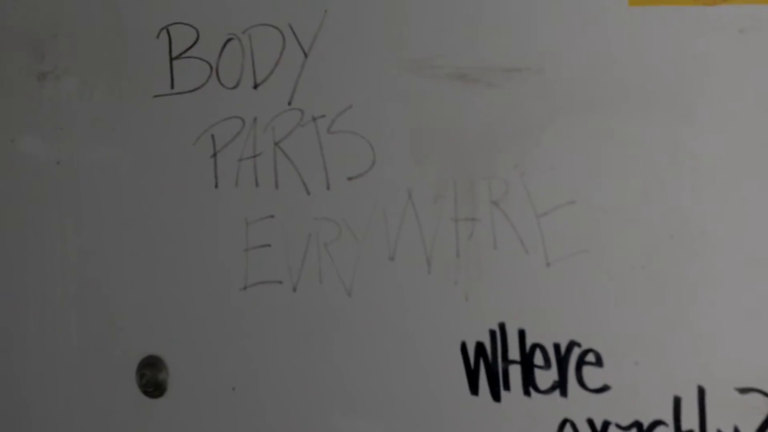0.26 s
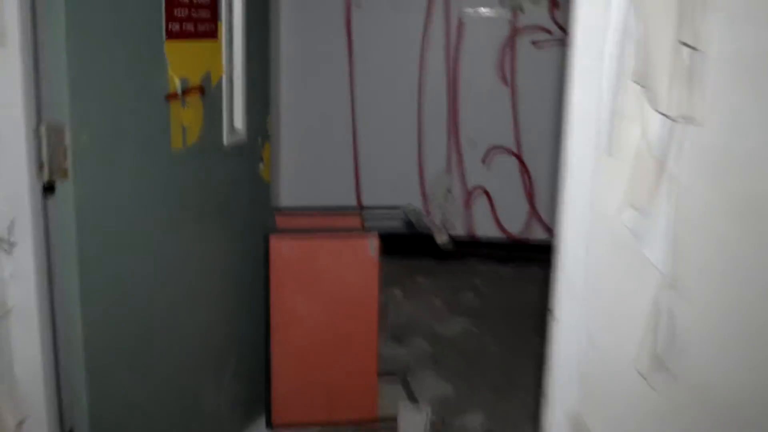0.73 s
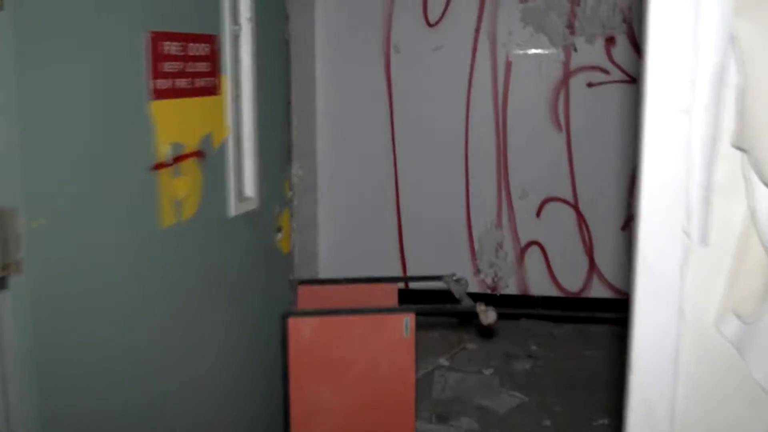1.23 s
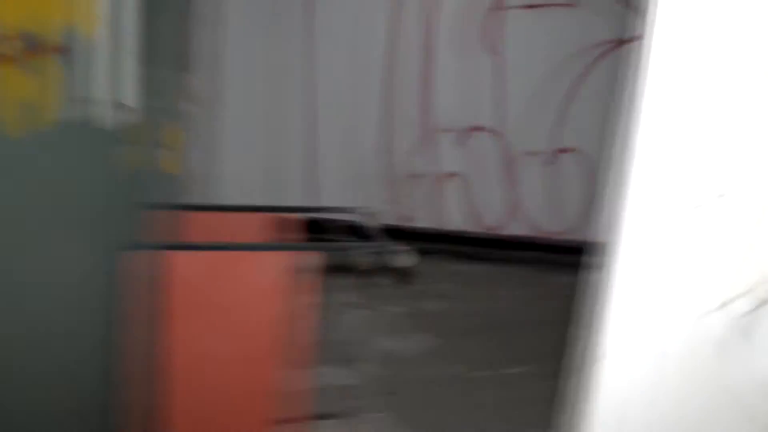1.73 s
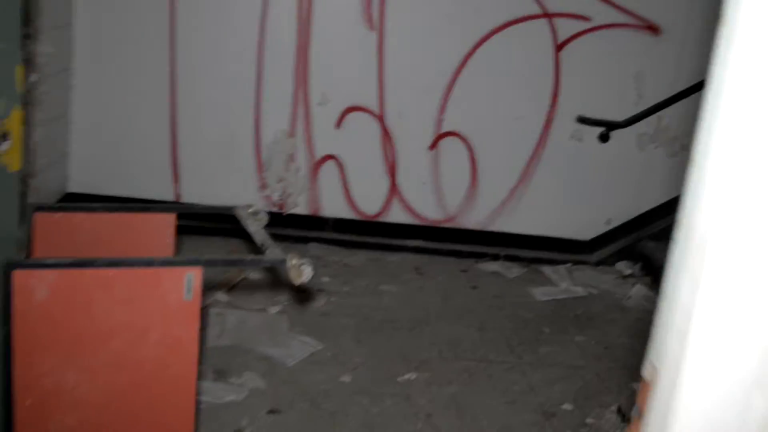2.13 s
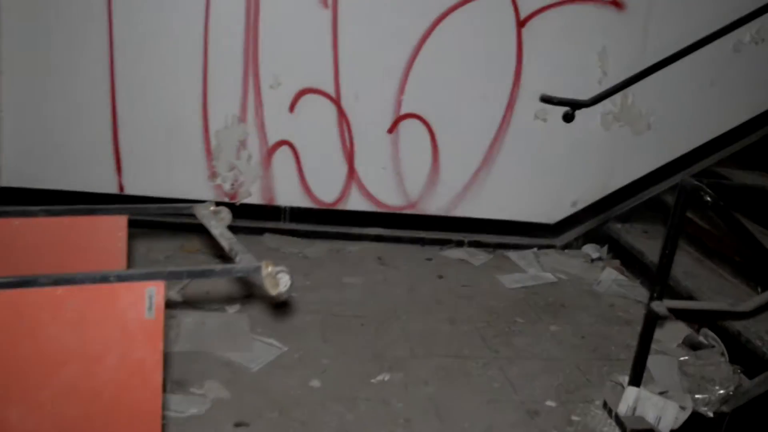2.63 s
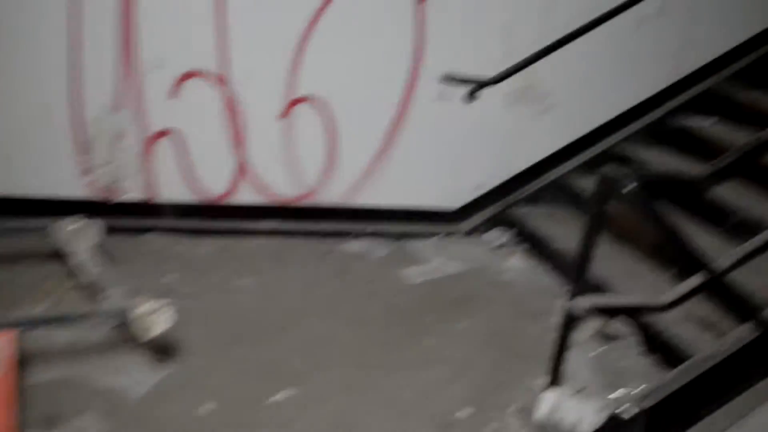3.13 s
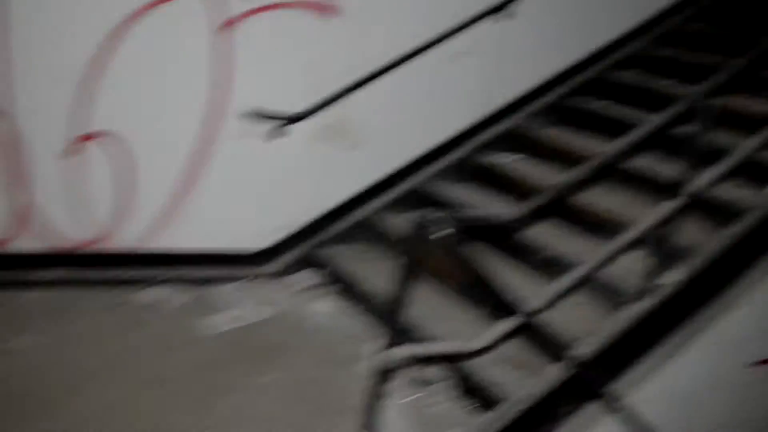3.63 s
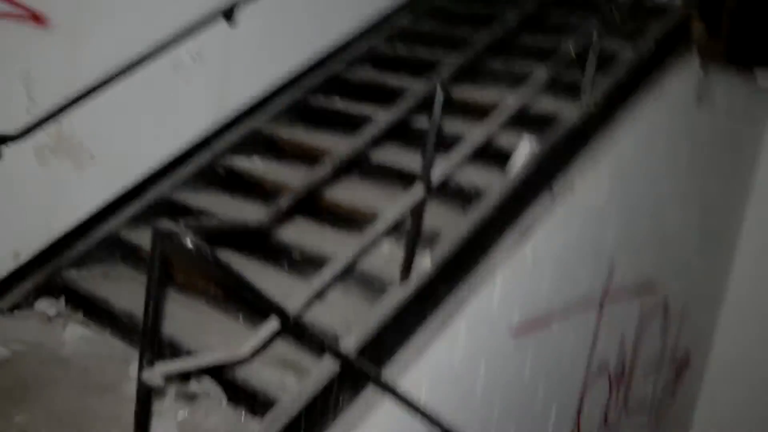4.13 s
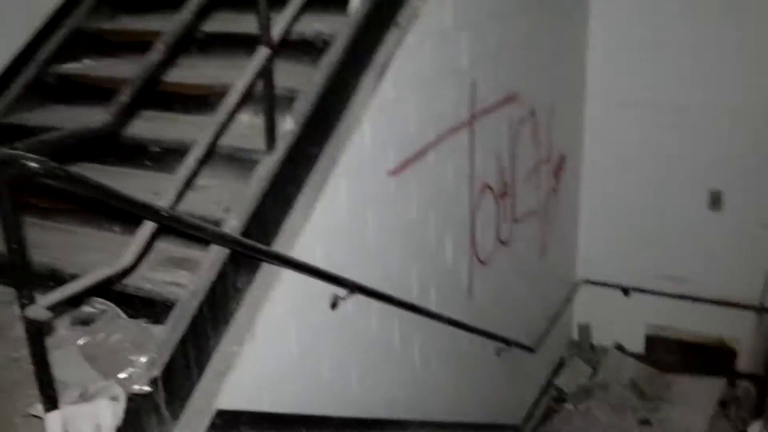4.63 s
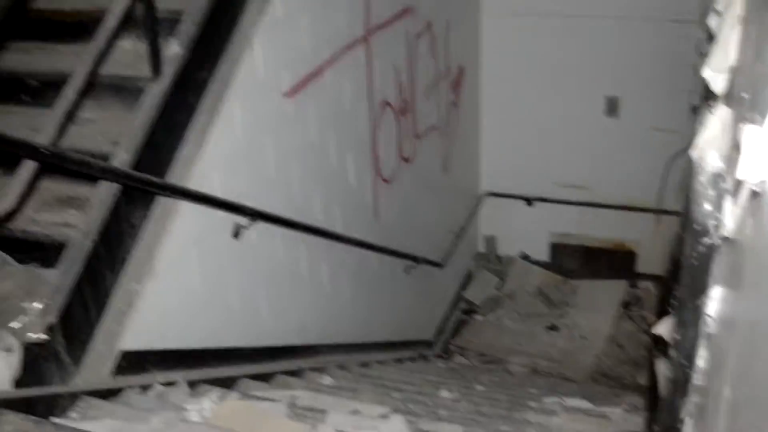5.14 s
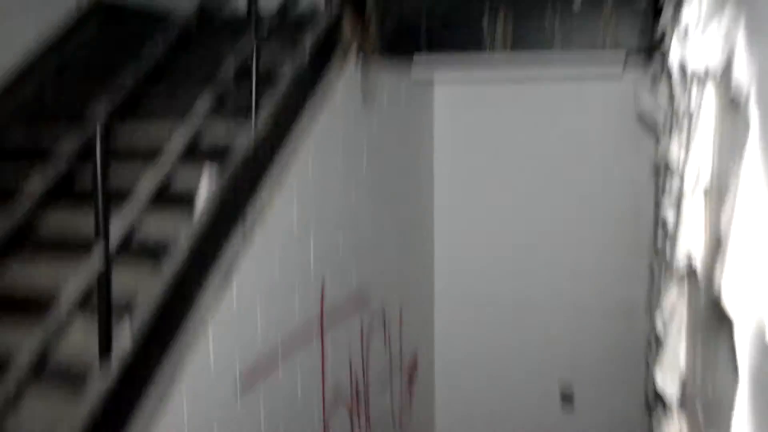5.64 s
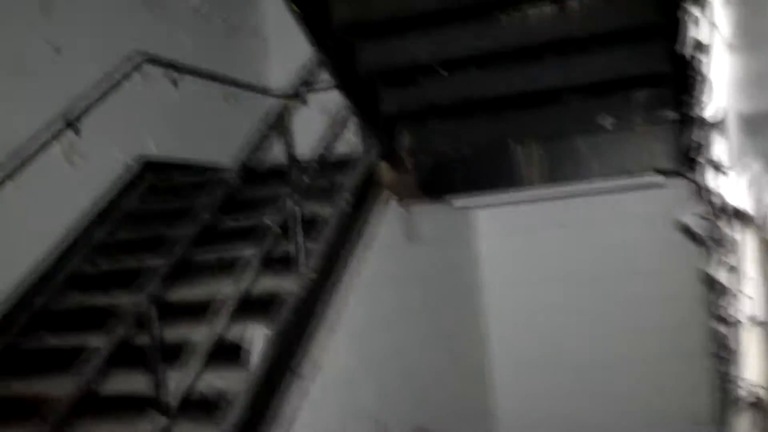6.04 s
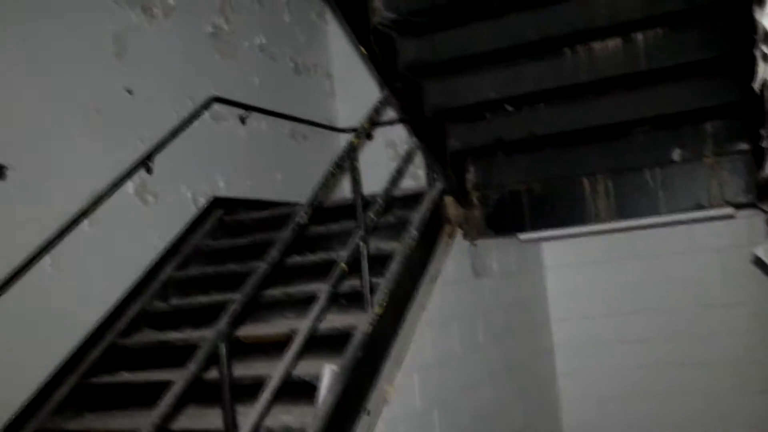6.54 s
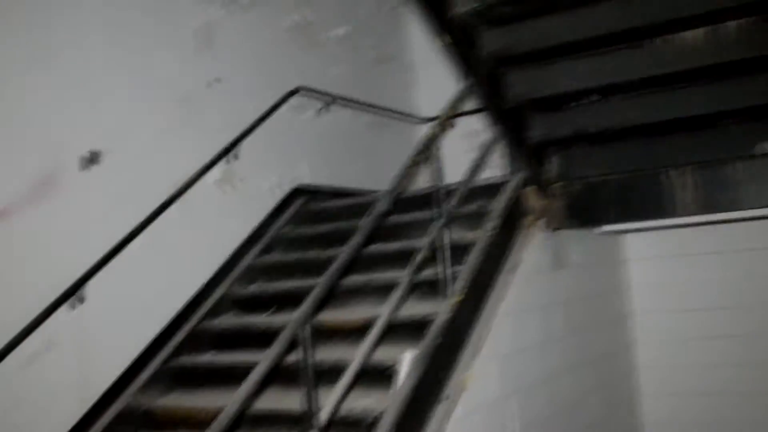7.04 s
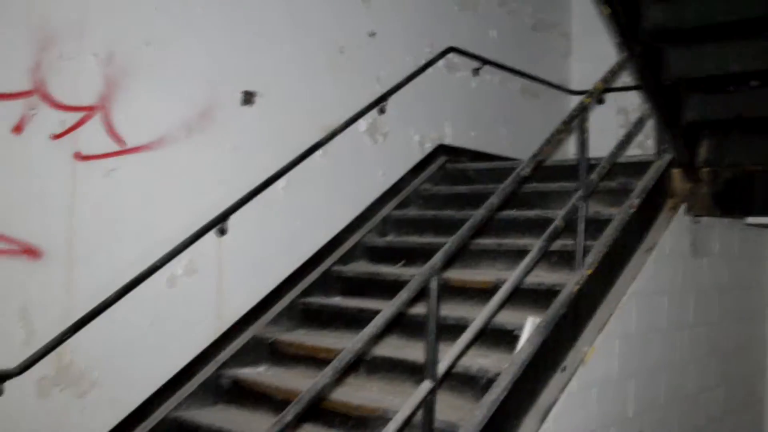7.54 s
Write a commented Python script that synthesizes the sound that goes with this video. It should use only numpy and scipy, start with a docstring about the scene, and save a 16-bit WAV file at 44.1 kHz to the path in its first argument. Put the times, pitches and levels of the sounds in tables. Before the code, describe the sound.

A quiet abandoned stairwell with hard walls, heard through one microphone near the walker's feet. Airy room tone and faint hiss start slightly stronger, with a low hum that fades after about 0.3 s. A small crackle at 0.1 s and light scuffs lead to the first footstep at 0.9 s: soft heel thud, sharp cluster of breaking flakes, grinding grit and a hollow slab knock near 1.0 s. The second step lands at 1.7 s, with strong snaps around 2.1 s. The third, slower step begins at 2.7 s, with a dense, full crunch and louder knock near 2.85 s, then crackles until about 3.4 s. Debris thins to small ticks; a brighter snap comes at 5.0 s with a faint scuff after. Near-stillness follows until light shuffles from 6.9 s to the end around 7.8 s. Each crunch rings briefly in the stairwell.

```python
"""Feet on fallen plaster and paint flakes, from a doorway into a bare concrete stairwell, at one microphone.
Over a quiet room tone with a low hum strong at first, stray flakes snap and the feet shuffle lightly.
Then three slow footsteps: each heel thuds, the sole rolls flat and grinds the grit, slabs knock, and flakes
snap, full-bodied under the weight and thin once it lifts. Later the walker only shifts on the spot.
Close walls answer grainy noise bursts at once; noise with a decaying envelope makes the stairwell ring on."""
import sys
import numpy as np
from scipy import signal
from scipy.fft import rfft, irfft, next_fast_len
from scipy.io import wavfile
from scipy.ndimage import map_coordinates

SR = 44100
rng = np.random.default_rng(int(sys.argv[2]) if len(sys.argv) > 2 else 0)


def bounce(signal):
    """Save signal as a 16-bit WAV file at the path given by the first command-line argument."""
    frames = np.transpose(np.atleast_2d(signal))
    limited = np.clip(frames, -1, 1)
    pcm = np.round(limited * 32767).astype(np.int16)
    wavfile.write(sys.argv[1], SR, pcm)


N = 342657

LIFE = 36864  # samples in one contact sound, its tail included
AGE = np.arange(LIFE) / SR  # s since the contact
HZ = np.fft.rfftfreq(LIFE, 1 / SR)
BLOW = np.sqrt(0.02 * SR)  # gives a sound of energy 1 an rms of 1 over 20 ms

# footsteps: heel_down_s, roll_s (until the sole is flat), weight_stays_s, heel_level_db, heel_pitch_hz,
# sole_level_db, grind_level_db
FOOTSTEPS = [(0.874, 0.052, 0.25, -38.5, 330, -54.5, -33), (1.711, 0.042, 0.21, -46.5, 282, -48.5, -37.5),
             (2.681, 0.15, 0.6, -45.5, 565, -51.5, -43.5)]


def amp(db):
    """Decibels to gain."""
    return 10 ** (np.asarray(db) / 20)


def unit(x):
    """Scale to rms 1."""
    return x / np.sqrt(np.mean(x ** 2) + 1e-20)


def packet(x):
    """Scale to energy 1."""
    return x / np.sqrt(np.sum(x ** 2) + 1e-20)


def fade(t, t60):
    """Exponential decay, down 60 dB after t60 seconds."""
    return np.exp(-np.log(1000) * t / t60)


def along(points, hz):
    """Interpolate (Hz, value) points on a log frequency axis."""
    point_hz, value = np.transpose(points)
    return np.interp(np.log(hz + 1), np.log(point_hz + 1), value)


def curves(rows):
    """One value per sample for each column after the time."""
    s, *columns = np.transpose(rows)
    return [np.interp(np.arange(N) / SR, s, column) for column in columns]


def filtered(x, response):
    """Filter x by a response given as a function of frequency."""
    size = next_fast_len(len(x) + SR // 2)
    spectrum = rfft(x, size) * response(np.fft.rfftfreq(size, 1 / SR))
    return irfft(spectrum, size)[:len(x)]


def resonance(f, hz, width):
    """A causal resonance of height 1, width in Hz."""
    return 1j * f * width / (hz * hz - f * f + 1j * f * width)


def add(track, s, sound):
    """Mix a sound into the track at time s."""
    part = track[max(round(s * SR), 0):][:len(sound)]
    part += sound[:len(part)]


def wobble(rate):
    """A smooth random curve, rate knots a second."""
    knots = rng.standard_normal(int(N * rate / SR) + 4)
    return map_coordinates(knots, [np.arange(N) * rate / SR])


def room_tone(hum_hz=90.6, waver_db=3.0):
    """Air moving through the building and a faint hiss, as shaped noise, and two wavering hums."""
    # colour of the moving air: pitch_hz, level_db (per Hz)
    air_colour = [(15, -23), (25, -7.5), (60, -5.5), (120, -0.5), (200, -0.5), (300, -2), (600, -2.5),
                  (950, 0), (1400, -4.5), (2000, -11), (3000, -16.5), (5000, -39.5), (16000, -94)]
    # colour of the hiss: pitch_hz, level_db (per Hz)
    hiss_colour = [(300, -17), (1500, 5), (2800, 0), (5000, -3.5), (9800, -7), (12000, -16), (14000, -27),
                   (16000, -50.5)]
    # levels over time: time_s, air_level_db, hiss_level_db
    air_levels = [(0, -51.5, -56.5), (0.45, -57.5, -61), (2.6, -60.5, -62), (4, -61, -67), (6.2, -62, -70),
                  (7.77, -59.5, -63)]
    # upper hum over time: time_s, level_db
    upper_levels = [(0, -76), (4.5, -78.5), (7.77, -66)]
    low_db, low_rest_db = -64, -84  # strong at first, then barely there
    low_ends_s, low_t60 = 0.32, 0.35

    def noise(response):
        return unit(filtered(rng.standard_normal(N), response))

    t = np.arange(N) / SR
    air_db, hiss_db = curves(air_levels)
    upper_db, = curves(upper_levels)
    air = amp(air_db + 0.34 * wobble(9)) * noise(lambda f: amp(along(air_colour, f)))
    hiss = amp(hiss_db) * noise(lambda f: amp(along(hiss_colour, f)))

    strength = amp(low_db) * fade(np.maximum(t - low_ends_s, 0), low_t60) + amp(low_rest_db)
    tone = unit(np.sin(2 * np.pi * hum_hz * t + 0.5 * wobble(6.8)))
    low_hum = strength * amp(waver_db * wobble(13)) * tone
    # the upper hum is noise in a narrow band, so it wavers by itself
    upper_hum = amp(upper_db) * noise(lambda f: resonance(f, 212, 49) ** 2)
    return air + hiss + low_hum + upper_hum


def flake_colour(body_db, clack_db, fizz_db, ring_hz, ring_db=0, ring_width=0.24):
    """Causal response of debris: thick ones have body, thin ones fizz, each has one damped resonance."""
    # average colour of the debris: pitch_hz, level_db (per Hz)
    debris = [(60, -40), (200, -28.5), (450, -12.5), (620, -7.5), (760, -6), (1100, -1), (1800, -2),
              (3200, -5), (5000, -7.5), (6500, -9.5), (8200, -10.5), (10300, -14.5), (13000, -30.5),
              (16000, -46.5)]
    tilt = [(700, body_db), (1500, clack_db), (3200, 0), (4400, 0.001), (6800, fizz_db)]  # Hz, dB
    # folding the cepstrum forward in time makes the response minimum-phase
    cepstrum = irfft(np.log(amp(along(debris, HZ) + along(tilt, HZ))))
    cepstrum[1:LIFE // 2] *= 2
    cepstrum[LIFE // 2 + 1:] = 0
    ring = 1 + amp(ring_db) * resonance(HZ, ring_hz, ring_width * ring_hz)
    return np.exp(rfft(cepstrum)) * ring


def grains(rate, spread_db):
    """Random tiny impulses, rate a second; a positive spread makes a few strong, a negative one a few weak."""
    size = amp(spread_db * np.minimum(rng.standard_exponential(LIFE), 4))
    return (rng.random(LIFE) < rate / SR) * size * rng.choice([-1, 1], LIFE)


def close_walls(force, t60=0.11):
    """Every grain breaks at its own spot, so its reflections add in power to those of the others."""
    echo_power = fade(AGE, t60) ** 2 * (AGE > 0.002)
    power = np.abs(irfft(rfft(force ** 2) * rfft(echo_power)))
    return packet(grains(rate=7000, spread_db=3.0) * np.sqrt(power))


def stairwell_tail(force):
    """Diffuse sound builds up in the stairwell; its treble dies first."""
    # ring of the stairwell: pitch_hz, t60_s
    stairwell = [(200, 0.42), (1200, 0.47), (3000, 0.47), (6000, 0.41), (12000, 0.37)]
    hz, t, noise = signal.stft(rng.standard_normal(LIFE), SR, nperseg=256)
    drive = np.add.reduceat(force ** 2, np.arange(0, LIFE, 128))  # energy per noise frame
    decay = fade(t, along(stairwell, hz)[:, None]) * (1 - fade(t, 0.11))
    power = np.abs(signal.fftconvolve(decay ** 2, drive[None], axes=1)[:, :len(t)])
    return signal.istft(noise * np.sqrt(power), SR, nperseg=256)[1][:LIFE]


def heard(force, colour, far_db, walls_db=-1, stairwell_db=-9):
    """A contact with the close walls' reflections, together of energy 1, then the stairwell's tail."""
    def tinted(x):
        return packet(irfft(rfft(x) * colour))

    near = tinted(packet(force) + amp(walls_db) * close_walls(force))
    return near + amp(stairwell_db + far_db) * tinted(stairwell_tail(force))


def weight_on(s):
    """Share of the walker's weight on the debris: it grows as the sole rolls flat, stays, and lifts."""
    lift_s = 0.13
    return sum(np.interp(s - heel_s, np.cumsum([0, roll_s, stay_s, lift_s]), [0, 1, 1, 0])
               for heel_s, roll_s, stay_s, *_ in FOOTSTEPS)


def snap(t60=0.0068):
    """One fracture through a flake: a click of nearly even spectrum, smeared over a few milliseconds."""
    phase = np.angle(rfft(rng.standard_normal(LIFE) * fade(AGE, t60)))
    return packet(irfft(np.exp(1j * phase)) * fade(AGE, 0.028))


def chips(count=9):
    """Splinters fly off just after a snap, each with a brief ring at its own pitch."""
    low_hz, high_hz = 1000, 9980
    ring_t60, mean_delay_s = 0.016, 0.007
    track, t = np.zeros(LIFE), AGE[:SR // 20]
    for when, pitch, size in rng.random((count, 3)):
        hz = low_hz * (high_hz / low_hz) ** np.sqrt(pitch)
        ring = np.sin(2 * np.pi * hz * t) * fade(t, ring_t60)
        add(track, -mean_delay_s * np.log(1 - when), amp(-10 * size) * ring)
    return packet(track)


def fracture(share):
    """One snap; its crumbling share follows as a spray of grains, a few splinters and a second snap."""
    rise_t60, crumble_t60 = 0.004, 0.033
    chip_db, aftersnap_s, aftersnap_db = -3, 0.0073, -7.5
    share = np.clip(share, 0, 1)
    swell = (1 - fade(AGE, rise_t60)) * fade(AGE, crumble_t60)
    spray = packet(grains(rate=2500, spread_db=5.0) * swell)
    crumble = spray + amp(chip_db) * chips()
    add(crumble, aftersnap_s, amp(aftersnap_db) * snap())
    return np.sqrt(1 - share) * snap() + np.sqrt(share) * packet(crumble)


def cracks():
    """Flakes snap; the more weight on a piece and the more it clacks, the fuller it sounds."""
    # flakes that snap: start_s, level_db, ring_pitch_hz, clack_db, fizz_db, crumbling_share (0-1)
    flakes = [(0.08, -38, 3530, 2.5, 4.5, 1), (0.9242, -21.5, 910, -8, 0.5, 1),
              (0.9524, -19.5, 3060, -3.5, 6, 0.65), (0.9598, -22.5, 1850, -3, -3.5, 0.47),
              (1.1221, -27, 1000, 2.5, 5, 0.4), (1.2296, -35.5, 2260, -3, -4.5, 1),
              (1.2583, -43.5, 2170, -1, 10.5, 0.6), (1.332, -44, 2600, -7, 1, 0.5),
              (1.4044, -35.5, 1870, -10.5, 3, 0.95), (1.6621, -29, 3140, -3.5, 7.5, 0.85),
              (1.669, -31.5, 3700, -2, 1, 0.6), (1.7487, -26, 1280, -0.5, -14.5, 0.46),
              (1.8223, -35, 1700, -8, 3, 0.6), (1.86, -30, 1560, -6.5, 3.5, 0.7),
              (1.926, -40, 1740, -2, 5.5, 0), (2.0138, -36.5, 3800, 4, 2, 0.04),
              (2.1127, -22, 2450, -2, -6.5, 0.14), (2.1411, -24, 1290, -9.5, -6.5, 0.1),
              (2.2263, -37, 2380, -2, -10.5, 0.46), (2.2934, -40.5, 1300, -3.5, -1, 0.6),
              (2.3327, -34, 2580, -1.5, -10, 0.1), (2.435, -41.5, 2160, 0.5, 1, 0.05),
              (2.498, -46, 2250, -0.5, 5, 0.1), (2.59, -43.5, 2680, -4, -4.5, 0.23),
              (2.8123, -27, 1050, 8, 5, 0.78), (2.8297, -26, 1130, -2, 4, 1),
              (2.8485, -21, 1050, 6, 4.5, 0.7), (2.9601, -30, 2580, 0, 1.5, 1),
              (3.0175, -35.5, 1980, 1.5, 7.5, 0.9), (3.0589, -27.5, 7900, 0, 8.5, 0.7),
              (3.0682, -28.5, 1920, 8, -11, 0.1), (3.0916, -25, 1470, 2.5, 6.5, 0.07),
              (3.1768, -29, 1500, -1.5, 3, 0.27), (3.2482, -36, 3970, -4, 6.5, 0.15),
              (3.266, -43, 1570, 1, 4, 0.5), (3.354, -37.5, 1640, -1, 6, 0.85),
              (3.368, -35, 4270, -3, -8, 0), (3.4015, -32.5, 4420, -5, 3, 0.36),
              (3.6416, -39.5, 960, -4, 3, 0.7), (3.649, -37, 2920, -1.5, 6.5, 0.5),
              (3.778, -48.5, 780, -3, 4, 0.9), (3.9543, -48.5, 4200, -5, 1, 0.1),
              (4.138, -45, 2070, 1.5, -3, 0.4), (4.1548, -59, 2070, -9, 11, 0.2),
              (4.245, -63.5, 2250, -11, 0, 0.2), (4.486, -40.5, 2340, 2, 1.5, 0.85),
              (4.87, -50.5, 1860, 1, -3, 0.6), (4.9907, -29, 4700, -7, 6, 0.23),
              (5.965, -71, 4010, -4, 1, 0.4), (6.39, -70.5, 2960, -3, 4.5, 0.5)]
    # how much of a snap reaches the stairwell: time_s, level_db
    stairwell_send = [(0.3, 6), (0.9, -1.5), (1.65, 2), (2.2, -2.5), (3.2, 3), (3.6, 2.5), (5, 5.5)]
    free_body_db, weight_body_db = -5.5, 6.5  # a loose flake; added when full weight presses it down
    body_db_per_octave, mid_hz = -0.5, 2000  # slightly less body per octave that the ring lies below mid_hz
    body_per_clack = 0.5  # a piece that clacks has more body too (dB per dB)
    loose_ring_db, ring_width = 3.5, 0.25  # the flake's own resonance; width as a share of its pitch
    weight_damps_db, ring_per_fizz = 0.5, -0.2  # flakes that fizz less ring more (dB per dB)
    weight_muffles_db = 2  # a sole on the flake shields the stairwell from it

    track = np.zeros(N)
    for s, db, ring_hz, clack_db, fizz_db, share in flakes:
        weight = weight_on(s)
        octaves_below = np.log2(mid_hz / ring_hz)
        body_db = free_body_db + weight_body_db * weight
        body_db += body_db_per_octave * octaves_below + body_per_clack * clack_db
        ring_db = loose_ring_db - weight_damps_db * weight + ring_per_fizz * fizz_db
        colour = flake_colour(body_db, clack_db, fizz_db, ring_hz, ring_db, ring_width)
        far_db = np.interp(s, *np.transpose(stairwell_send)) - weight_muffles_db * weight
        add(track, s, BLOW * amp(db) * heard(fracture(share), colour, far_db))
    return track


def shuffles():
    """A lightly sliding sole crushes a stream of fine grains that swells into an even hiss."""
    # light shuffles of the feet: start_s, length_s, level_db, body_db, ring_pitch_hz
    slides = [(0.185, 0.03, -40.5, -7, 3030), (0.255, 0.058, -43.5, -7, 2780),
              (1.376, 0.011, -42.5, 4, 1900), (1.535, 0.014, -43.5, -10, 3360),
              (1.591, 0.011, -45, -15, 5000), (1.971, 0.04, -50.5, 15.5, 1308),
              (2.724, 0.031, -46, 6, 1710), (5.118, 0.12, -52.5, -8, 2770),
              (6.924, 0.068, -54.5, 4.5, 1700), (7.048, 0.042, -47, 6.5, 2420),
              (7.154, 0.043, -56, -20, 1270), (7.344, 0.018, -40, -12, 8660), (7.63, 0.025, -56, 13, 530),
              (7.726, 0.06, -48, 4, 4580)]
    clack_db, fizz_db = -2, 3  # colour of loose grit
    track = np.zeros(N)
    for s, length_s, db, body_db, ring_hz in slides:
        stroke = (1 - fade(AGE, 0.018)) * fade(np.maximum(AGE - length_s, 0), 0.24)
        colour = flake_colour(body_db, clack_db, fizz_db, ring_hz, ring_db=5, ring_width=0.13)
        slide = heard(grains(rate=2200, spread_db=3.0) * stroke, colour, far_db=1)
        add(track, s, amp(db) * np.sqrt(length_s * SR) * slide)
    return track


def thud(hz, t60, width=0.92):
    """A soft contact, dying in t60, shakes a broad, low resonance of whatever lies under the foot."""
    push = grains(rate=1400, spread_db=-6) * fade(AGE, t60)
    return BLOW * heard(push, resonance(HZ, hz, width * hz) ** 2, far_db=-4.5)


def steps():
    """The heel thuds and crushes grit, the sole slaps flat, and spiky grit grinds while the weight is on."""
    heel_t60 = 0.07
    crush_db, crush_t60, crush_hz = -0.5, 0.15, 1310  # grit under the heel; level over the thud
    sole_t60, sole_hz = 0.33, 223
    grind_t60, grind_hz = 0.82, 1000  # the grit settles under the flat sole
    track = np.zeros(N)
    for s, roll_s, _, heel_db, heel_hz, sole_db, grind_db in FOOTSTEPS:
        add(track, s, amp(heel_db) * thud(heel_hz, heel_t60))

        crush = grains(rate=3600, spread_db=-0.5) * fade(AGE, crush_t60)
        colour = flake_colour(13, 6, -7, crush_hz)
        add(track, s, BLOW * amp(heel_db + crush_db) * heard(crush, colour, far_db=1.5))

        add(track, s + roll_s, amp(sole_db) * thud(sole_hz, sole_t60, width=0.6))

        press = weight_on(s + AGE) * fade(np.maximum(AGE - roll_s, 0), grind_t60)
        colour = flake_colour(-3.5, -1, 0, grind_hz, ring_db=-4.5, ring_width=0.13)
        grind = heard(grains(rate=1400, spread_db=7.0) * press, colour, far_db=0)
        add(track, s, amp(grind_db) * np.linalg.norm(press) * grind)
    return track


def crumbs(span, level_db, count):
    """Single crumbs of plaster tick under the shifting weight, at random times within the span."""
    track = np.zeros(N)
    for when, size, ring in rng.random((count, 3)):
        colour = flake_colour(-3, -3.5, 12, ring_hz=3000 * 3 ** ring)
        tick = BLOW * amp(level_db - 10 * size) * heard(snap(), colour, far_db=-5.5)
        add(track, np.interp(when, [0, 1], span), tick)
    return track


def knocks():
    """Now and then a slab of plaster tips under the sole and knocks hollowly, a narrower low resonance."""
    # slabs that rock and knock on the floor: start_s, level_db, pitch_hz
    slabs = [(1.033, -35, 860), (2.851, -26.5, 770)]
    track = np.zeros(N)
    for s, db, hz in slabs:
        add(track, s, amp(db) * thud(hz, t60=0.043, width=0.3))
    return track


def scene():
    """Feet on the littered floor, which rings under every contact, and the room, at one microphone."""
    # resonances of the floor: pitch_hz, width_hz, level_db
    floor_modes = [(730, 61, -5.5), (864, 19, -6), (1046, 40, -9.5), (1367, 21, -5), (1990, 79, -13.5),
                   (2447, 130, -14), (2950, 30.8, -8), (3230, 15, -17), (3846, 10, -12)]
    # span of the crumbs' ticks: first_s, last_s
    walking = (0.96, 3.95)

    def floor(f):
        return 1 + sum(amp(db) * resonance(f, hz, width) for hz, width, db in floor_modes)

    ticks = crumbs(walking, level_db=-54, count=22)
    feet = cracks() + shuffles() + steps() + ticks + knocks()
    return (filtered(feet, floor) + room_tone())[None]


def record(dry):
    """The microphone port cuts two notches, and nothing above the band limit is kept."""
    # notches of the microphone port: pitch_hz, width_hz, depth (0-1)
    notches = [(5680, 580, 0.73), (6910, 248, 0.66)]
    top_hz = 16200

    def port(f):
        cuts = [1 - np.clip(depth, 0, 1) * resonance(f, hz, width) for hz, width, depth in notches]
        return np.prod(cuts, axis=0)

    return filtered(dry[0], lambda f: port(f) * (f < top_hz))[None]


dry = scene()
out = record(dry)
bounce(out)
```